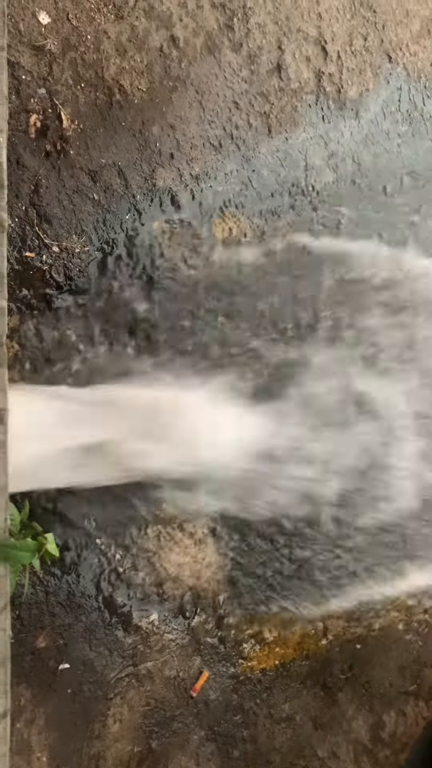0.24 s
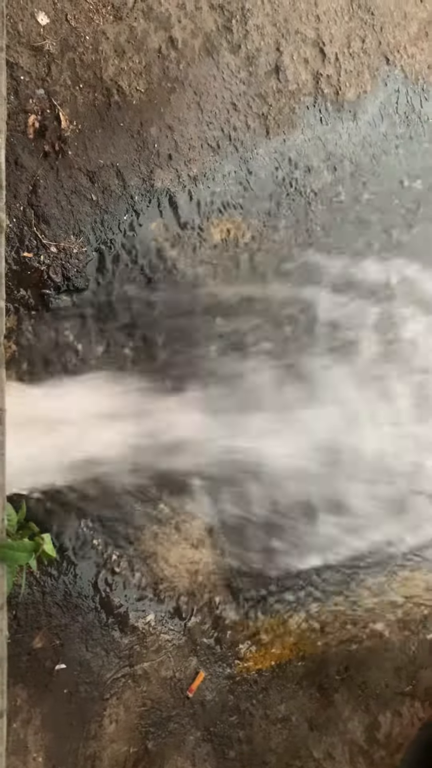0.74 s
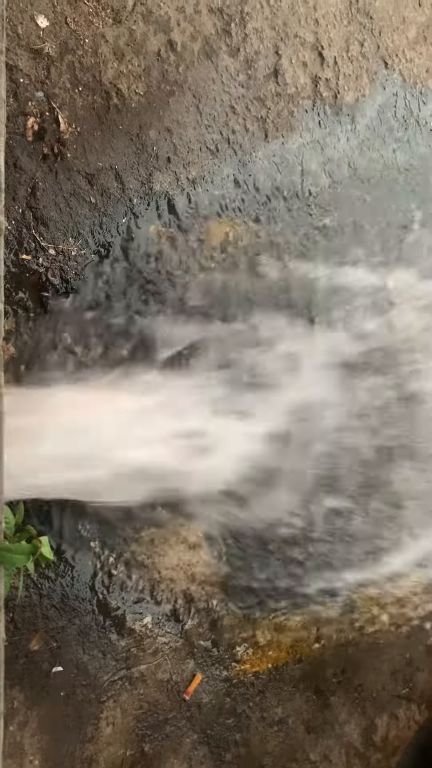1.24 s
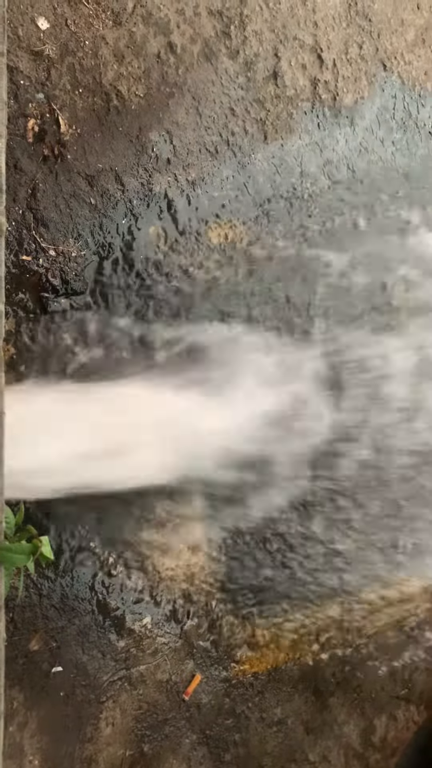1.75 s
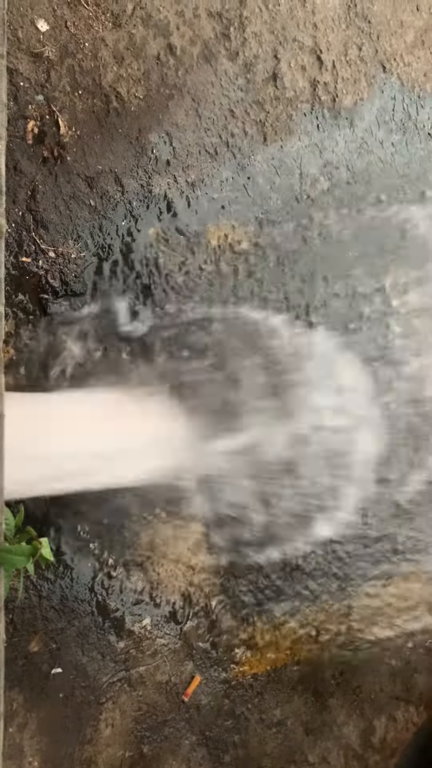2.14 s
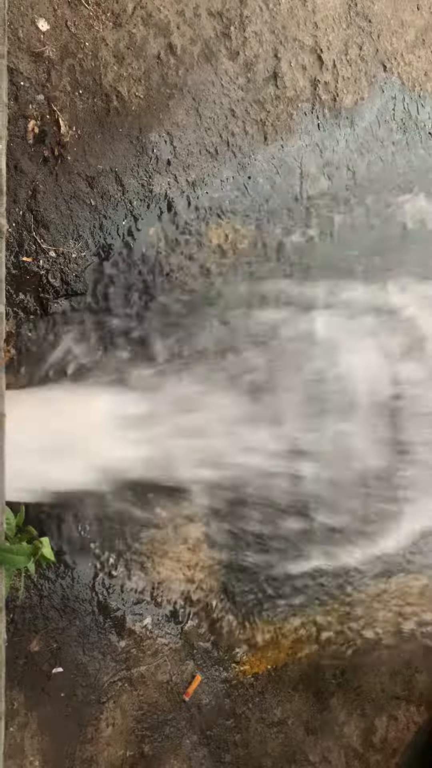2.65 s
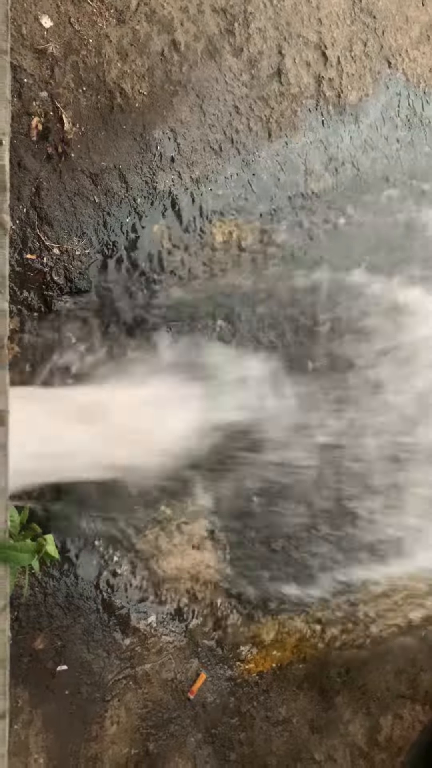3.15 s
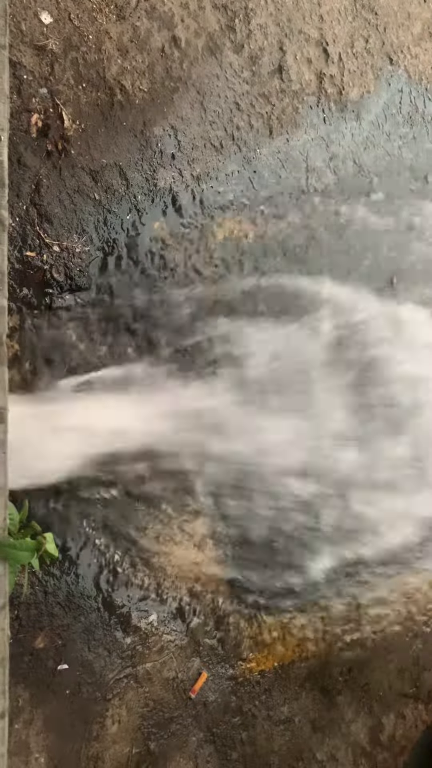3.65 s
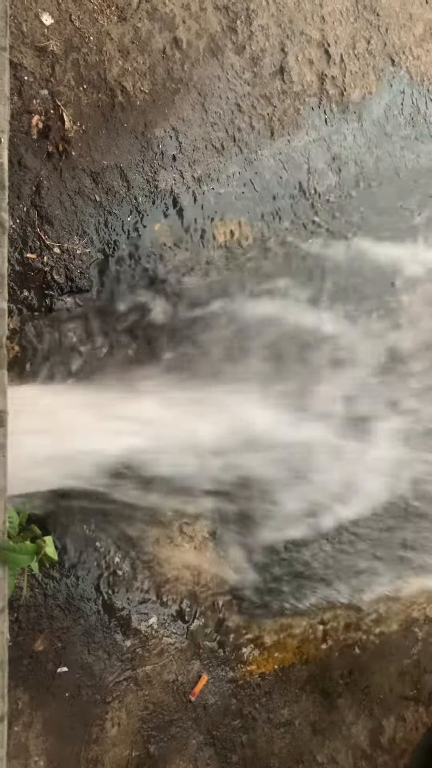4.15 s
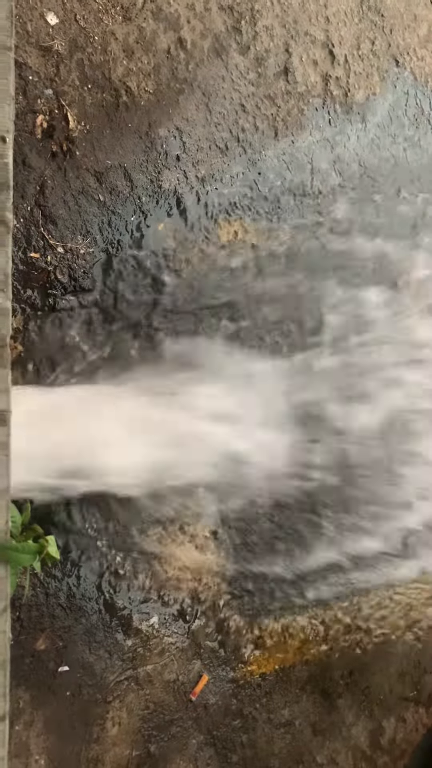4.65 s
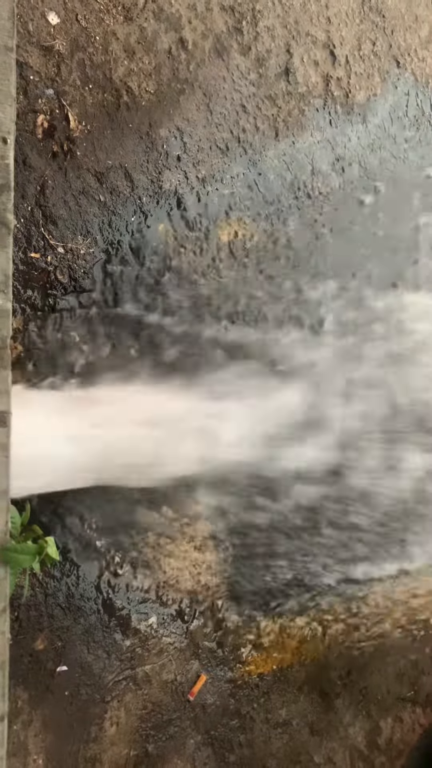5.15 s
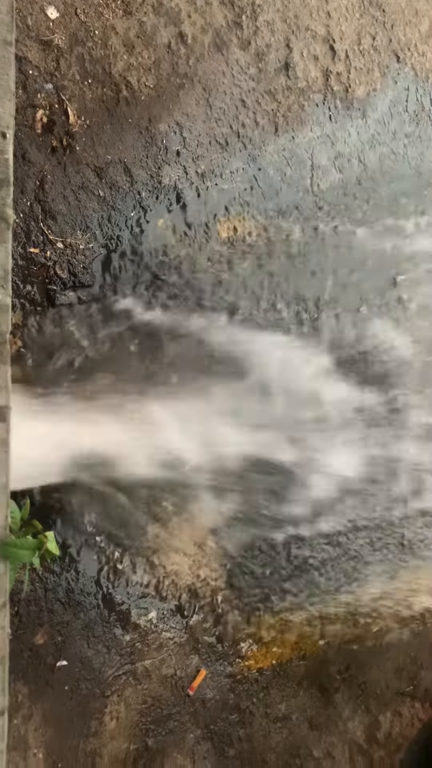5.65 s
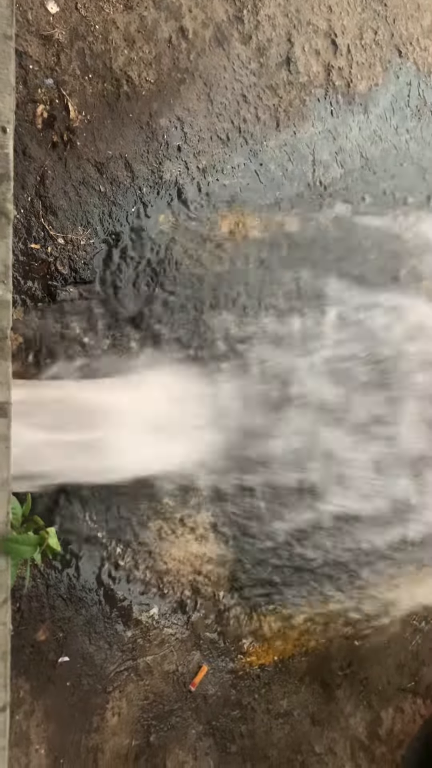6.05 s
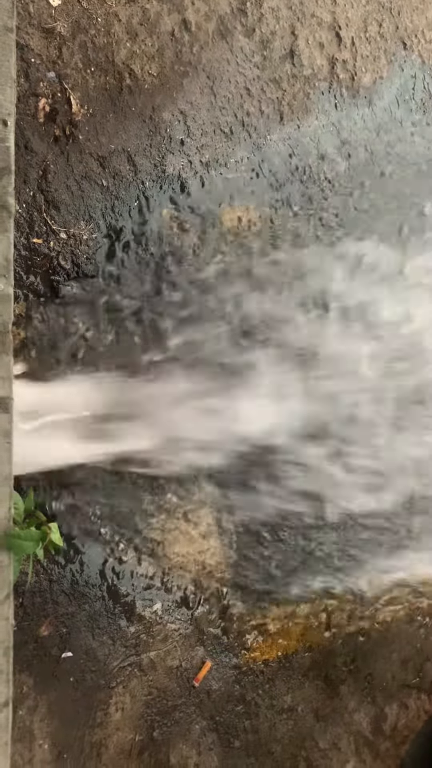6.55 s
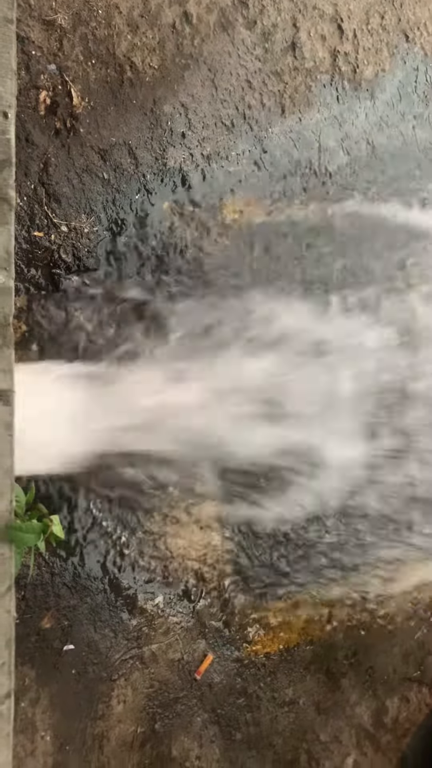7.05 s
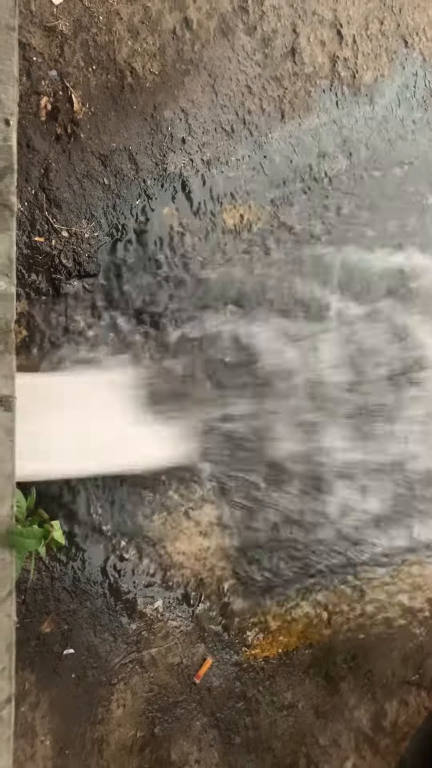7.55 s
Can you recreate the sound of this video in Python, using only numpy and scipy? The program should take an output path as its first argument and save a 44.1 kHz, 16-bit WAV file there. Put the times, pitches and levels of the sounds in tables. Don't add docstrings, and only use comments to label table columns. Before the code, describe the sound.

Heavy rain and running sheets of water hiss densely from all sides throughout, wide and mostly in the middle pitches. In the centre, close by, storm water pours from a drain pipe onto wet concrete in irregular surges, roughly two to four each second. The pipe rumbles hollowly around 100 Hz with a softer thud beneath. Deep bubble-like gulps stand out near 0.1, 1.0, 1.5, 2.0, 2.2, 2.9, 3.3, 4.6 and 7.1 seconds. The jet shatters into bright fizzing spray, swelling around 0.7, 1.2, 2.5, 3.2, 3.9 to 4.1, 5.2 and 5.8, with longer splashes from 6.4 to the end. Round drops plop nearby, notably at 1.3, 2.5 and 5.2, and tiny high ticks of spatter flick past, clearest at 1.3, 3.2, 5.4 and 7.6. The low thud is heaviest around 6.2. The flow never stops, ending mid-gush near 8 seconds.

```python
import sys
import numpy as np
from scipy import signal
from scipy.fft import rfft, irfft, next_fast_len
from scipy.io import wavfile
from scipy.ndimage import uniform_filter1d, map_coordinates

SR = 44100
rng = np.random.default_rng(int(sys.argv[2]) if len(sys.argv) > 2 else 0)


def field_ratio(decibels):
    return 10 ** (np.asarray(decibels, dtype=float) / 20)


def inscribe(sig):
    pcm = np.round(np.clip(np.atleast_2d(sig).T, -1, 1) * 32767)
    wavfile.write(sys.argv[1], SR, pcm.astype(np.int16))


N = 343962

# (frequency [Hz], density [dB per Hz])
WASH_SPECTRUM = [(150, -11), (400, -4.5), (600, 2), (820, -1.5), (1020, 0.5), (1200, -2.5), (1480, 0),
                 (1750, -4), (2050, -2), (2500, -10.5), (3200, -10), (4500, -22), (16000, -55)]
# (frequency [Hz], likeness [0-1])
WASH_LIKENESS = [(300, 0), (520, 0.38), (870, 0.04), (1050, 0.4), (1200, 0.08), (1480, 0.58), (1800, 0.24),
                 (2300, 0)]
# (time [s], swell [dB])
SHEETS = [(.12, 1), (.3, 3), (.79, 1.5), (1.29, 3), (1.66, 0.5), (2.48, 1.5), (2.85, 2), (3.67, 2.5),
          (4.32, 2.5), (4.95, 3), (5.6, 1.2), (6.01, 0.5), (6.43, 0.8), (6.82, 3), (7.26, 0.5), (7.49, 2),
          (7.66, 2.5)]
# (time [s], peak [dB], pitch [Hz])
BIG_DROPS = [(0.2284, -11, 1490), (0.255, -10, 1530), (0.73, -12, 1060), (0.8666, -11, 1510),
             (1.2595, -12, 1780), (1.2944, -6, 961), (1.639, -11, 1570), (1.8203, -25, 1430),
             (2.0862, -9, 1400), (2.1854, -14, 1480), (2.4433, -9, 1480), (2.4785, -5, 1410),
             (2.829, -14, 1530), (3.2066, -13, 1040), (3.4082, -19, 1330), (3.8492, -15, 1380),
             (4.2014, -9, 1420), (4.4623, -12, 1850), (5.0823, -26, 1390), (5.1963, -3.5, 2150),
             (5.25, -7, 1770), (5.3795, -13, 1500), (5.443, -17, 1640), (5.5985, -10, 953),
             (5.832, -14, 1190), (5.9334, -16, 1460), (6.0132, -35, 964), (6.4163, -11, 966),
             (6.8364, -8, 1390), (7.6181, -9, 1510)]
# (time [s], peak [dB], pitch [Hz])
SPATTER = [(0.0798, -19, 6620), (1.2915, -9.5, 5670), (2.1046, -16, 6380), (2.172, -21, 7090),
           (2.4548, -30, 6490), (2.829, -13, 7130), (2.9053, -20, 7020), (2.9906, -19, 5940),
           (3.1108, -22, 7390), (3.2186, -8, 11500), (3.7923, -24, 5790), (3.8616, -16, 6700),
           (3.91, -22, 6340), (3.9325, -18, 6340), (4.3181, -19, 6330), (4.348, -17, 7460),
           (4.6533, -25, 6120), (4.7112, -25, 6500), (5.1622, -18, 5840), (5.4191, -11, 11300),
           (5.7798, -19, 6580), (5.834, -15.5, 7320), (6.349, -22, 6110), (6.8004, -23, 7090),
           (7.0688, -20, 6340), (7.6177, -10, 6120)]
# (frequency [Hz], density [dB per Hz])
SPRAY_SPECTRUM = [(1500, -20), (2400, -5), (3200, -.5), (4200, 0), (5200, -3), (6200, -4), (7400, -6),
                  (8200, -4.5), (10000, -6.5), (12000, -8.5), (16000, -9.3)]
# (time [s], length [s], swell [dB], extra mist [dB])
SPLASHES = [(0.017, 0.072, 2.2, -1), (0.24, 0.05, 1, 2.3), (0.36, 0.036, 2.5, -2), (0.736, 0.13, 1.5, 0.5),
            (1.24, 0.14, 0, 3), (1.45, 0.04, 0.5, 0), (1.848, 0.07, 1.2, -1), (2.06, 0.09, -1, 2),
            (2.55, 0.09, 1.5, 0.8), (2.84, 0.03, 1, 0.4), (2.993, 0.046, 2.2, 0), (3.245, 0.054, 1.5, 4),
            (3.64, 0.05, 1, -2), (3.9, 0.076, 3, -3), (4.09, 0.05, 3.7, -3), (4.2, 0.05, 0.5, 3.5),
            (4.35, 0.1, 0.5, 2), (4.66, 0.14, 0.1, 2.2), (5.0, 0.04, 0.7, 1), (5.19, 0.064, 2.8, -2),
            (5.422, 0.06, 0.5, 2.5), (5.83, 0.054, 2.5, -1), (6.426, 0.17, 2, -2), (6.75, 0.16, 0.4, 1.5),
            (7.1, 0.36, 2, -1.3), (7.69, 0.23, 1.7, -0.9)]
# (time [s], peak [dB], pitch [Hz])
GULPS = [(0.071, -7, 115), (0.356, -24, 107), (0.989, -7, 109), (1.478, -1, 143), (2, 0.5, 104.4),
         (2.227, 1, 106.4), (2.441, -9, 93), (2.634, -16, 109), (2.726, -24, 108), (2.92, -4, 96),
         (3.303, -2, 125), (3.418, -9, 93), (4.112, -6, 102), (4.386, -13, 70.0), (4.593, -4, 104),
         (5.084, -6, 90.5), (5.545, -30, 108), (5.806, -9, 104), (6.053, -37, 336), (6.055, -26, 101),
         (7.063, -20, 61.9), (7.063, 0, 100.5)]
# (time [s], length [s], strength [dB], brightness [dB])
SLUGS = [(.08, .13, 0.5, -6.5), (.38, .2, 4, -8), (.654, 0.11, -1, -2.5), (1.023, .27, -1.5, -2.5),
         (1.247, 0.065, 1.5, -9), (1.493, 0.095, .9, -9), (1.87, 0.13, 0, -4), (2.014, .044, 5.5, -4),
         (2.25, 0.11, -5, 1), (2.46, 0.29, -10, -3), (2.77, .066, 4, -6.5), (2.962, .05, -7, 4.5),
         (3.09, 0.17, -15, 6.5), (3.328, 0.071, 0, -2), (3.612, 0.12, 2, -1.5), (3.898, 0.079, 0.5, -2.5),
         (4.168, .15, -0.3, -0.5), (4.447, 0.07, -8, 2), (4.706, .15, -3.5, -3.5), (4.944, .15, -0.5, 0.5),
         (5.141, .04, -3.3, 3.5), (5.413, .17, -12, 4.5), (5.61, 0.16, 4.5, -14.5),
         (5.867, 0.078, 4, -11.5), (6.11, .14, 1, -3.5), (6.495, 0.26, 0, -6), (6.794, 0.1, -3.5, 0),
         (7.11, 0.12, -4, 1.5), (7.396, 0.09, 5.5, -5), (7.78, 0.24, -2.5, -1)]
# (time [s], thud [dB])
JET_WEIGHT = [(0, -27.5), (.5, -31), (1.6, -28.5), (2.0, -35), (2.3, -30), (3.0, -36), (3.4, -30),
              (4.3, -31), (4.7, -37.5), (5.2, -30.5), (6.2, -23), (7.4, -29), (7.8, -36)]
# (frequency [Hz], width [Hz], level [dB])
THUD_MODES = [(43.8, 15.4, -6), (65, 24, -0.5)]
# (frequency [Hz], width [Hz], level [dB])
FIRST_MODES = [(99.8, 23.4, 1.5), (136.7, 32.6, -3)]
# (frequency [Hz], width [Hz], level [dB])
HIGHER_MODES = [(162, 54, -5), (249, 38.6, -1.5), (291.3, 49, 0), (354, 97, -4.5), (450, 104, -11.5)]

SHEET_S = 0.055
WASH_FOLLOWS_SPRAY, WASH_FOLLOWS_THUD = 0.2, 0.054
WASH_FLICKER_DB, SPRAY_FLICKER_DB, MIST_FLICKER_DB = 0.32, 0.5, 0.33
SMOTHER_S, SMOTHER_SHARE = 0.14, 0.042
PORT_LAG_S, IN_PHASE_HZ = 1 / 4150, 2750
HOUSING_TURN = 1.46
TRICKLE_LOW_DB, TRICKLE_HIGH_DB = -6, -5.5
FIRST_MODE_DB, HIGHER_MODES_DB = -27.5, -25.5
THUD_FOLLOWS = 0.12


def rms_one(x):
    return x / np.sqrt(np.mean(x ** 2) + 1e-20)


def in_time(rows):
    s, *columns = np.transpose(rows)
    return [np.interp(np.arange(N) / SR, s, column) for column in columns]


def at_hz(points, hz):
    points_hz, values = np.array(points)[:, 0], np.array(points)[:, 1]
    return np.interp(np.log(hz), np.log(points_hz), values)


def shaped(x, response):
    size = next_fast_len(N)
    hz = np.maximum(np.fft.rfftfreq(size, 1 / SR), 1)
    return irfft(rfft(x, size) * response(hz), size)[..., :N]


def resonate(x, hz, width_hz):
    r = np.exp(-np.pi * width_hz / SR)
    poles = [1, -2 * r * np.cos(2 * np.pi * hz / SR), r * r]
    return signal.lfilter([(1 - r * r) / 2, 0, (r * r - 1) / 2], poles, x)


def drift(rate):
    r = np.exp(-80 * np.pi * rate / SR)
    noise = rng.standard_normal(N // 40 + 2002)
    slow = signal.lfilter([1], [1, -2 * r, r * r], noise)[2000:]
    return np.interp(np.arange(N) / 40, np.arange(len(slow)), rms_one(slow))


def swing(level_db, depth):
    return field_ratio(depth * (level_db - level_db.mean()))


def swells(s, length_s, heights):
    t = np.arange(0, N + 64, 64) / SR
    bells = np.exp(-2 * ((t[:, None] - s) / np.maximum(length_s, 0.02)) ** 2)
    return np.interp(np.arange(N) / SR, t, bells @ heights)


def impacts(per_s, spread_db):
    sizes_db = spread_db * np.minimum(rng.exponential(1, N), 5)
    sizes = field_ratio(sizes_db) * rng.choice([-1, 1], N)
    return rms_one(sizes * (rng.random(N) < per_s / SR))


def coloured(x, spectrum, patchy_db, per_octave, per_s, fleck_db):
    x = shaped(x, lambda hz: field_ratio(at_hz(spectrum, hz)))
    hz, s, cells = signal.stft(x, SR, nperseg=1024)
    where = np.meshgrid(per_octave * np.log2(1 + hz / 100), per_s * s, indexing="ij")
    patches = map_coordinates(rng.standard_normal((60, 400)), where, order=1, mode="wrap")
    flecks = uniform_filter1d(rng.standard_normal(patches.shape), size=3, axis=1)
    gain = field_ratio(patchy_db * patches + fleck_db * flecks)
    return rms_one(signal.istft(cells * gain, SR, nperseg=1024)[1][..., :N])


def bubbles(low_hz, high_hz, per_s, cycles):
    born = impacts(per_s, spread_db=4.0)
    dealt = rng.integers(0, 28, N)
    out = np.zeros(N)
    for k, hz in enumerate(np.geomspace(low_hz, high_hz, num=28)):
        out += resonate(born * (dealt == k) + 1e-18, hz, hz / cycles) / hz
    return rms_one(out)


def bursts(rows, cycles, rise):
    out = np.zeros(N)
    for s, peak_db, hz in rows:
        i = round(s * SR)
        turns = np.arange(min(round(12 * SR / hz), N - i)) * hz / SR
        shape = (1 - np.exp(-turns / 0.37)) * np.exp(-turns / cycles)
        ring = np.sin(2 * np.pi * turns * (1 + rise * turns))
        out[i:i + len(turns)] += field_ratio(peak_db) * shape * ring
    return out


def wash(level_db):
    alike = lambda hz: np.clip(at_hz(WASH_LIKENESS, hz), 0, 1)
    mid = shaped(impacts(9000, spread_db=2.0), lambda hz: np.sqrt(1 + alike(hz)))
    side = shaped(impacts(9000, spread_db=3.0), lambda hz: np.sqrt(1 - alike(hz)))
    ports = np.array([mid + side, mid - side])
    rain = coloured(ports, WASH_SPECTRUM, patchy_db=0.5, per_octave=3.87, per_s=18, fleck_db=6.0)
    froth = field_ratio(-41.5) * bubbles(750, 2517, per_s=450, cycles=23)
    return swing(level_db, depth=0.77) * (field_ratio(-27.0) * rain + froth)


def big_drops():
    return field_ratio(-4.0) * bursts(BIG_DROPS, cycles=2.4, rise=0.018)


def spatter():
    return field_ratio(5.5) * bursts(SPATTER, cycles=1.6, rise=0.004)


def spray(coarse_db, fine_db):
    clicks = impacts(14000, spread_db=2.5) * field_ratio(0.64 * drift(60))
    hiss = coloured(clicks, SPRAY_SPECTRUM, patchy_db=-0.45, per_octave=4.4, per_s=14, fleck_db=6.5)
    fizz = bubbles(2694, 13640, per_s=900, cycles=23)
    both = field_ratio(-28.5) * hiss + field_ratio(-41.0) * fizz
    coarse = signal.sosfiltfilt(signal.butter(2, 9000, fs=SR, output="sos"), both)
    mist = both - coarse
    return swing(coarse_db, depth=0.55) * coarse + swing(fine_db, depth=0.75) * mist


def at_ports(x):
    lag_turn = lambda hz: 2 * np.pi * PORT_LAG_S * (hz - IN_PHASE_HZ)
    turn = lambda hz: np.logaddexp(1.4 * lag_turn(hz), 1.4 * HOUSING_TURN) / 1.4
    return np.array([x, shaped(x, lambda hz: np.exp(-1j * turn(hz)))])


def jet(thud_db, slug_db):
    s, length_s, swell_db, mist_db = np.transpose(SPLASHES)
    t = np.arange(N) / SR
    hush_db = -SMOTHER_SHARE * np.interp(t - SMOTHER_S, t, slug_db)
    coarse_db = 1.9 * (swells(s, length_s, swell_db) + hush_db + SPRAY_FLICKER_DB * drift(20))
    fine_db = 1.7 * (swells(s, length_s, swell_db + mist_db) + hush_db + MIST_FLICKER_DB * drift(14))
    sheet_s, sheet_db = np.transpose(SHEETS)
    wash_db = swells(sheet_s, SHEET_S, sheet_db) + WASH_FLICKER_DB * drift(10)
    wash_db += WASH_FOLLOWS_SPRAY * coarse_db + WASH_FOLLOWS_THUD * thud_db
    return wash_db, coarse_db, fine_db


def surges():
    s, length_s, strength_db, bright_db = np.transpose(SLUGS)
    low = field_ratio(TRICKLE_LOW_DB) + swells(s, length_s, field_ratio(strength_db))
    high = field_ratio(TRICKLE_HIGH_DB) + swells(s, length_s, field_ratio(strength_db + bright_db))
    low_db, high_db = 20 * np.log10(low), 20 * np.log10(high)
    weight_db, = in_time(JET_WEIGHT)
    return weight_db + THUD_FOLLOWS * low_db, FIRST_MODE_DB + low_db, HIGHER_MODES_DB + high_db


def gulps():
    return field_ratio(-8.0) * bursts(GULPS, cycles=2.5, rise=0.028)


def rumble(modes, level_db):
    lumps = rng.standard_normal(N) * field_ratio(1.0 * drift(20))
    column = np.zeros(N)
    for k, (hz, width_hz, mode_db) in enumerate(modes):
        flicker = field_ratio(mode_db + 1.56 * drift(17))
        column += (-1) ** k * flicker * resonate(lumps, hz, width_hz)
    column = signal.sosfilt(signal.butter(3, 48, "high", fs=SR, output="sos"), column)
    column = signal.sosfilt(signal.butter(2, 560, fs=SR, output="sos"), column)
    return field_ratio(level_db.mean() + 1.8) * swing(level_db, depth=0.98) * rms_one(column)


def pipe(thud_db, first_db, higher_db):
    thud = rumble(THUD_MODES, thud_db)
    air_column = rumble(FIRST_MODES, first_db) + rumble(HIGHER_MODES, higher_db)
    return gulps() + thud + air_column


def scene():
    thud_db, first_db, higher_db = surges()
    wash_db, coarse_db, fine_db = jet(thud_db, first_db)
    around = wash(wash_db) * field_ratio(np.array([[-0.8], [0.8]]))
    across = at_ports(spray(coarse_db, fine_db) + big_drops() + spatter())
    outlet = pipe(thud_db, first_db, higher_db)
    middle = np.array([outlet * field_ratio(-0.92), np.roll(outlet, -3) * field_ratio(1.02)])
    return middle + around + across


def band_limit(x):
    return signal.sosfilt(signal.butter(12, 15999, fs=SR, output="sos"), x)


def record(dry):
    top_cut = signal.ellip(12, 0.5, 70, 15720, fs=SR, output="sos")
    mix = signal.sosfilt(top_cut, dry)
    return band_limit(mix)


dry = scene()
out = record(dry)
inscribe(out)
```